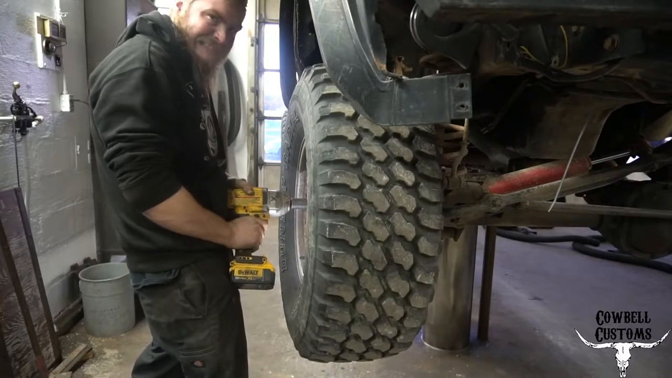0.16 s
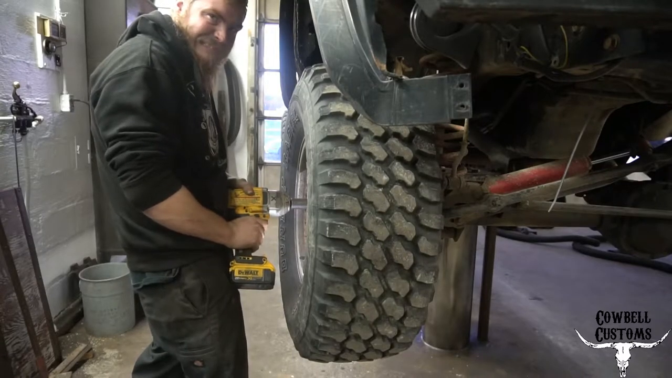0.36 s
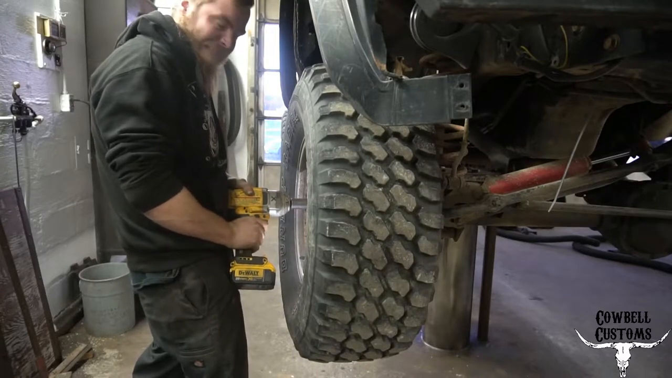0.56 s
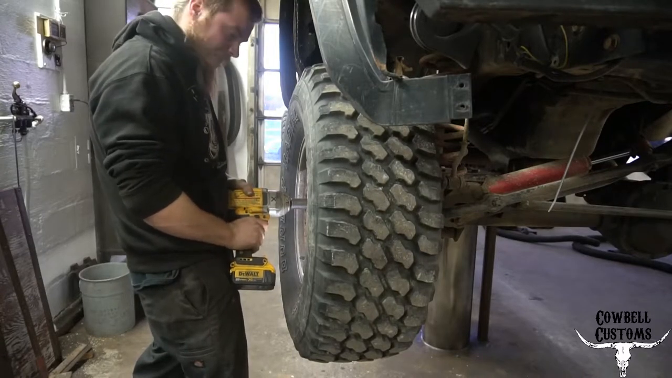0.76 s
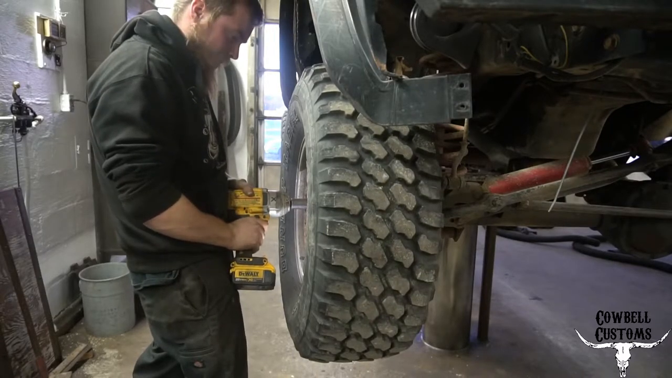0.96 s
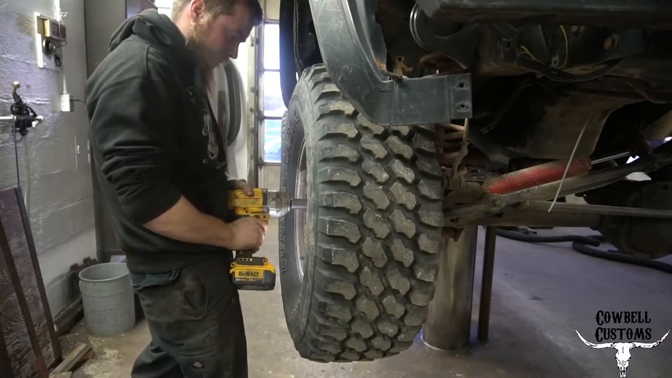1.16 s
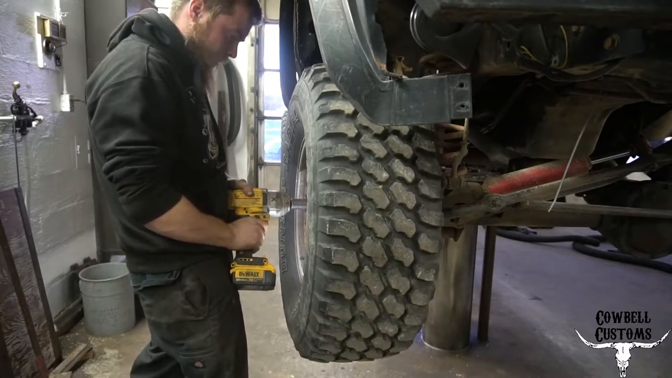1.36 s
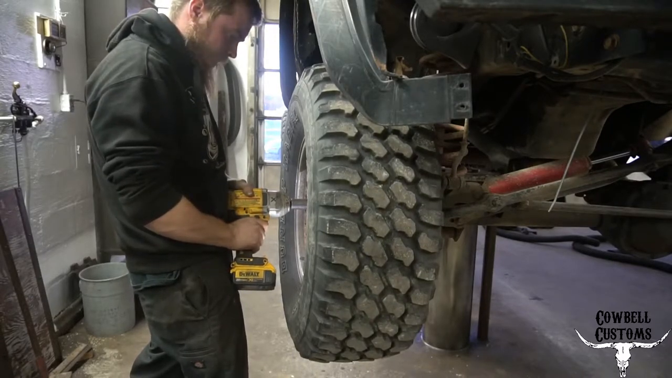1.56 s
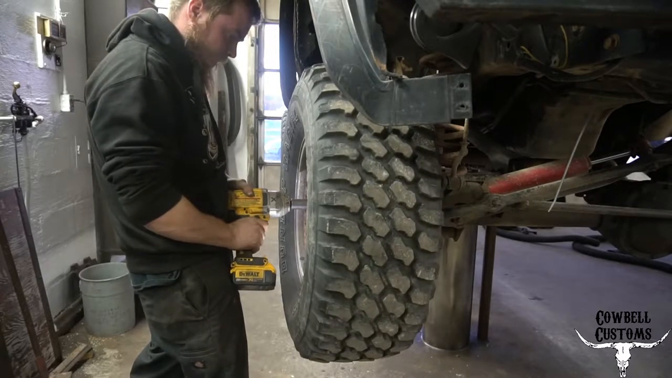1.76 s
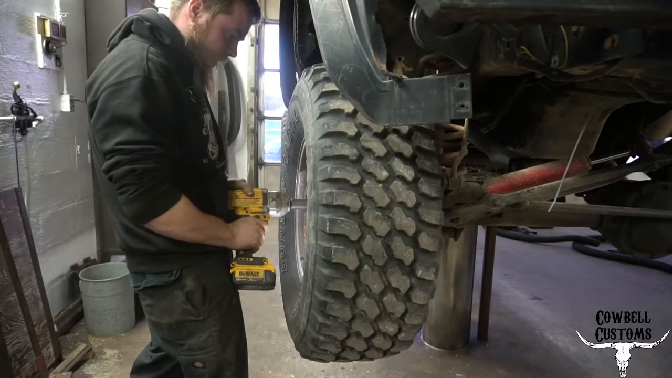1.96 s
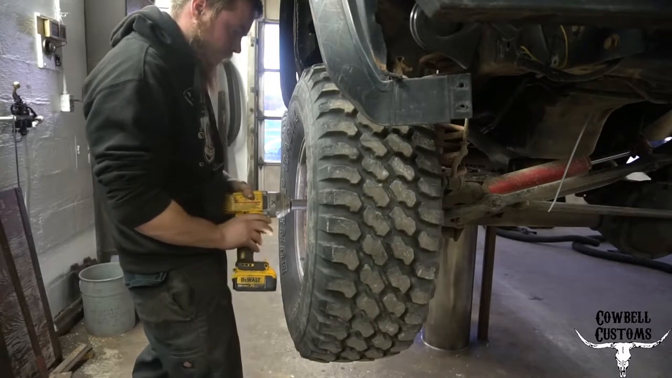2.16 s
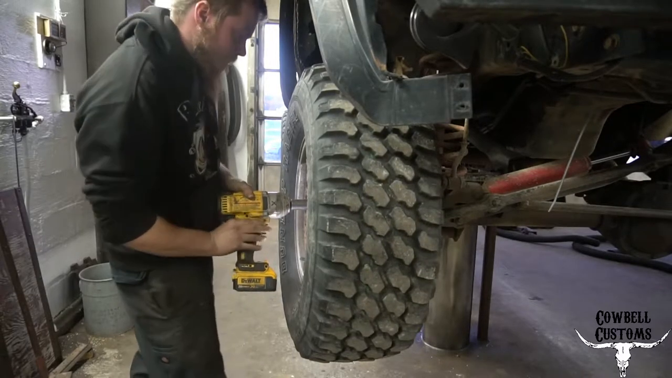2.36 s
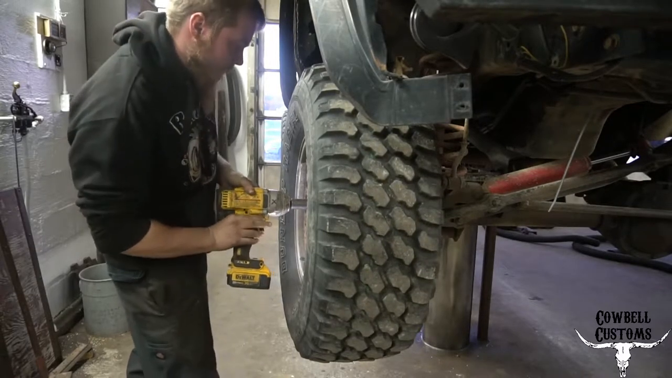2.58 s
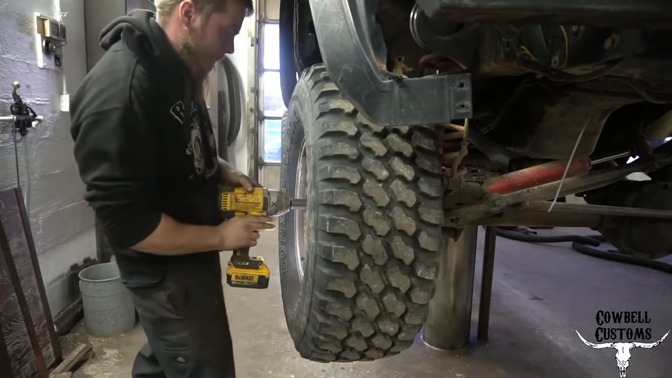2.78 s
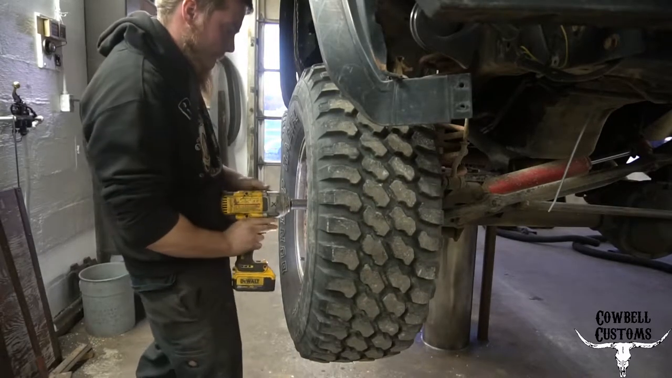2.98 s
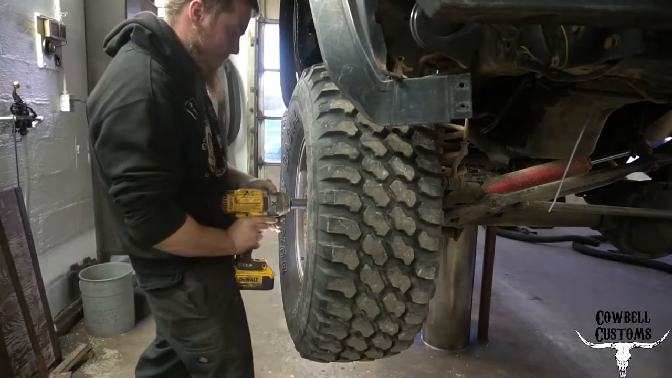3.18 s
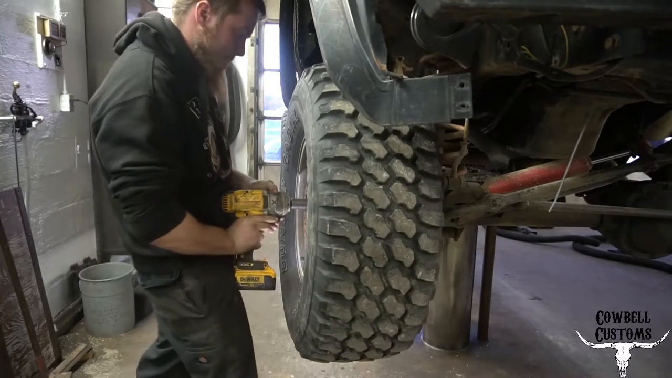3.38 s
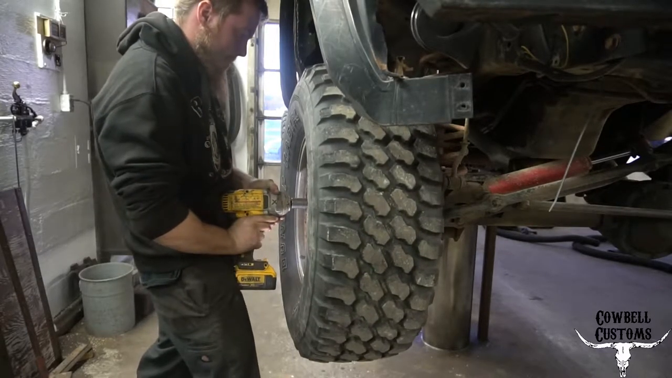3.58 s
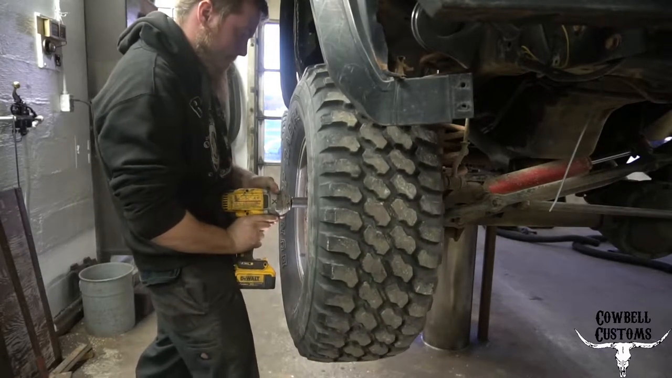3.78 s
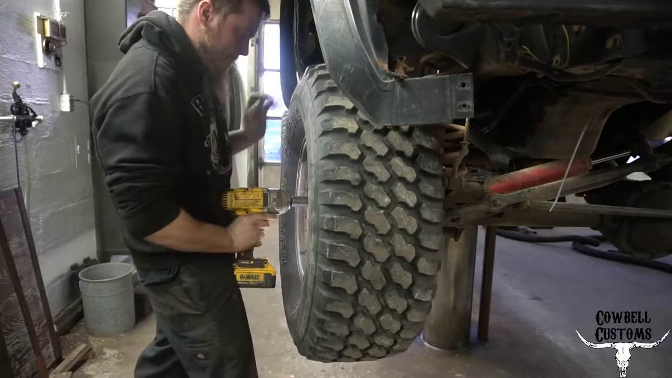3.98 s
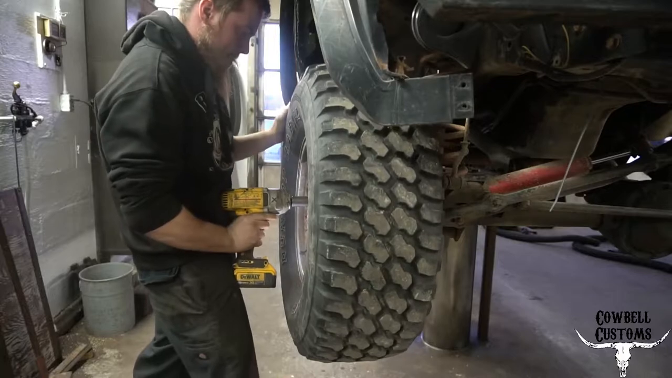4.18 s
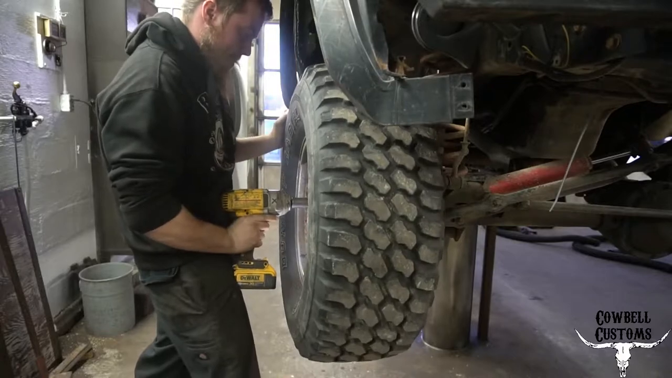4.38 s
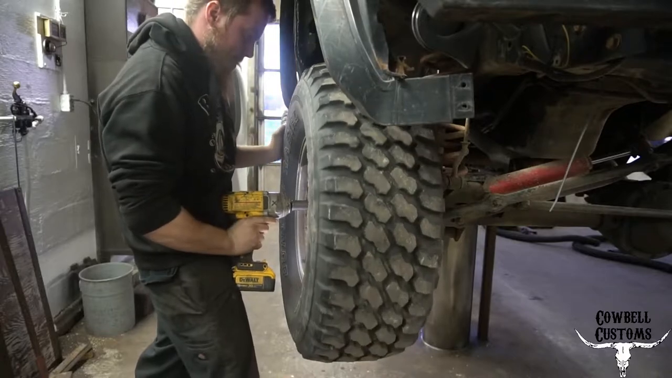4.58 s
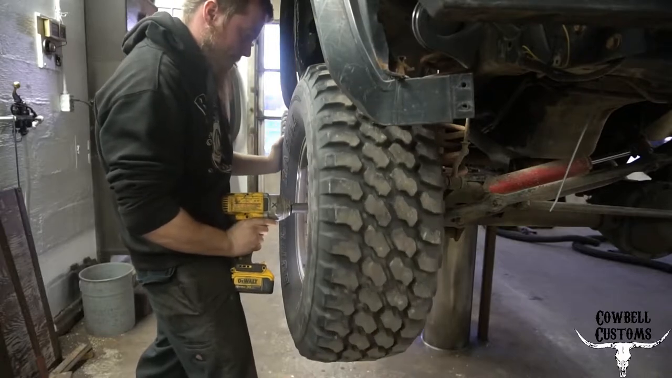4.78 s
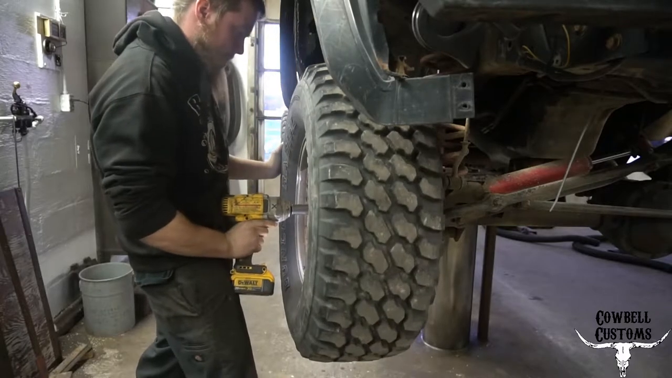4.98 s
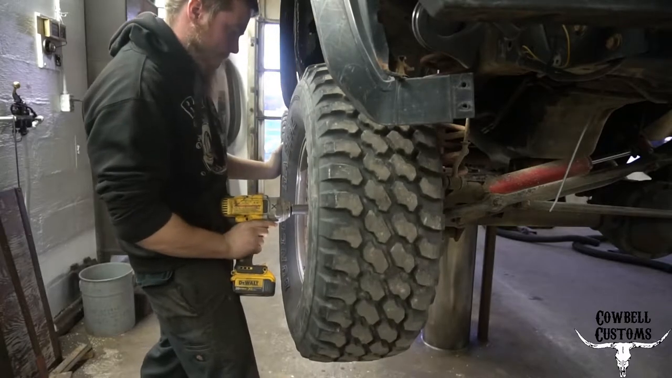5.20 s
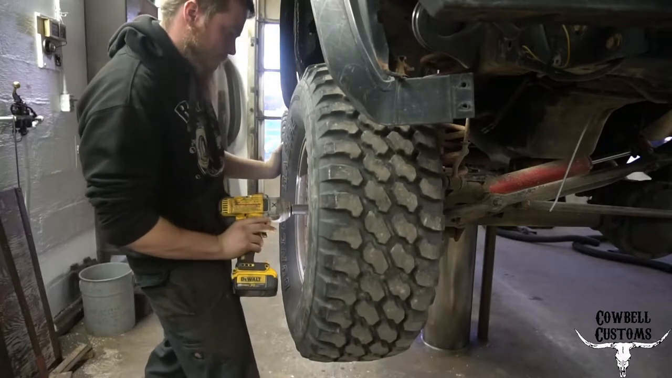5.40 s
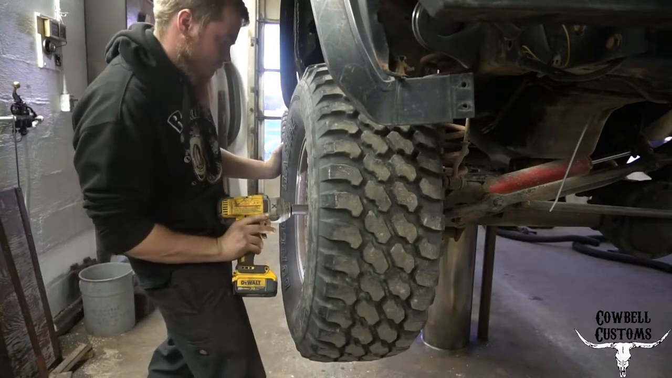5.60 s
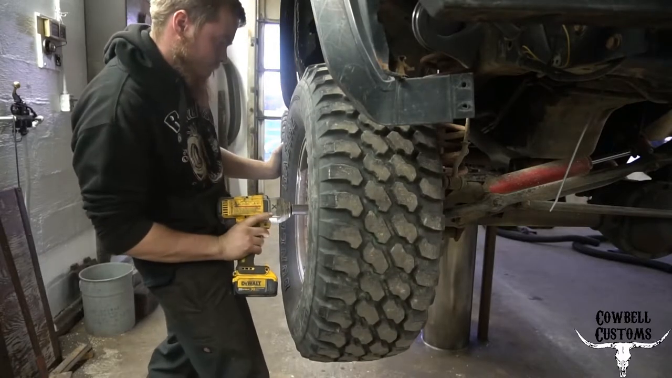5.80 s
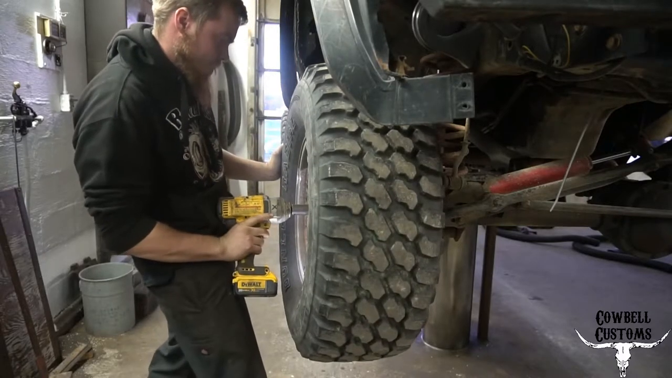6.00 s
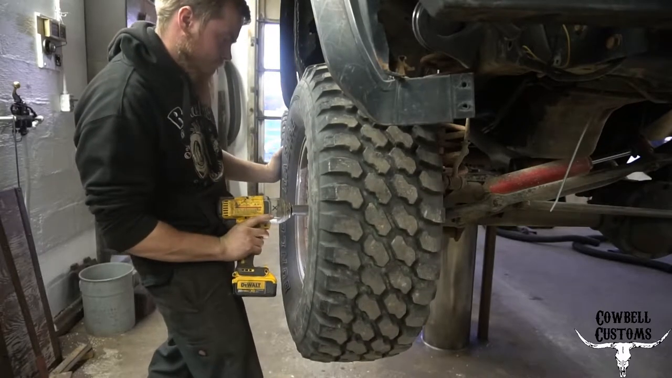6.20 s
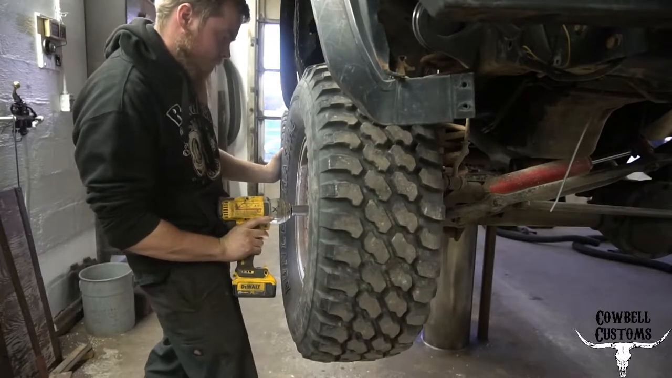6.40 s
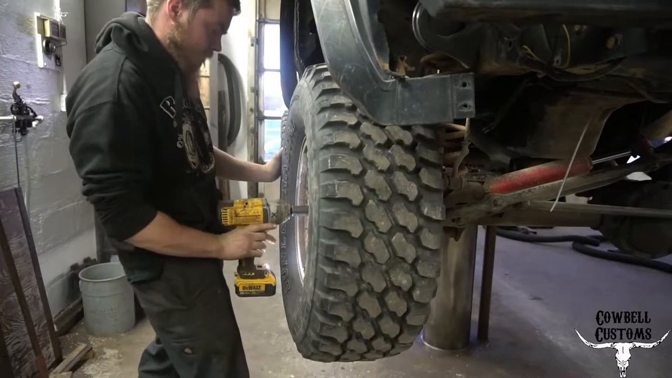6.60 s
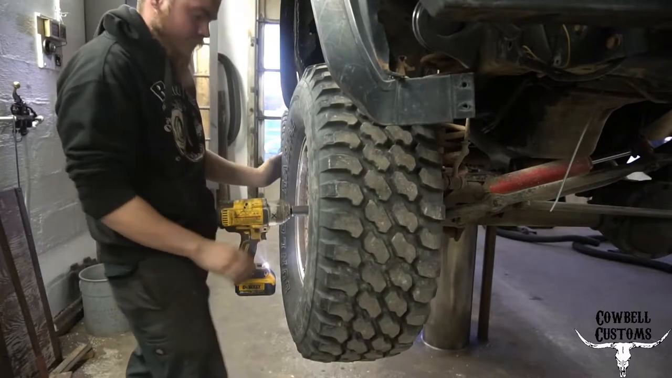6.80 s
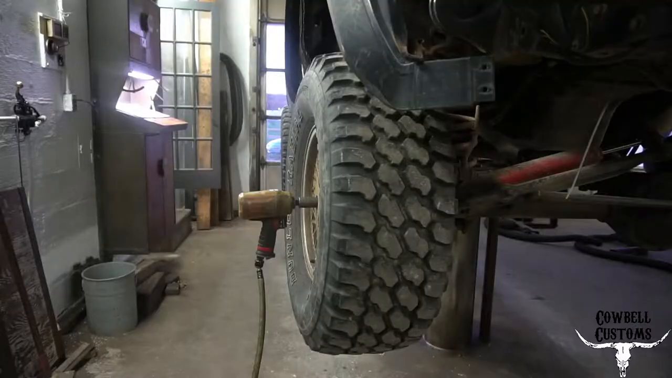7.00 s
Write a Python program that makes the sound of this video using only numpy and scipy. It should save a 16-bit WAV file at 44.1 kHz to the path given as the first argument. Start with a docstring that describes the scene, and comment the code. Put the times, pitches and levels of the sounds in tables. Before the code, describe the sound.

Hammering is already under way at 0 s: an impact wrench pounds a wheel nut at about 29 blows a second, a harsh, crackling steel rattle with bright short rings, wheel resonance and faint low tyre shaking. It stops near 2.1 s with a soft knock and a few quickening clanks; the hard-walled workshop rings out. A switch click follows at 2.4 s, with very faint ticks near 2.8 s over quiet air. At 3.2 s the trigger clicks, the motor briefly whirrs, loose clanks sound, and a second, more clattery burst runs from 3.3 to 5.3 s, its wheel ring damped after 4.7 s. It bounces to a stop, with a click at 5.5 s. Another click and spin-up at 5.8 s lead to a short burst from 5.9 to 6.5 s, ending in clanks that grow harder. At 6.8 s a compressor's low hum and throbbing airy rush cut in abruptly and continue to the end. The microphone is close and overloaded.

```python
"""An impact wrench hammers three tight lug nuts in a hard-walled workshop, close to an overloaded microphone.
Each blow is a short series of contacts: anvil modes ring, a noisy crack rides on top, wheel and room ring after.
The switch clicks, the motor spins up, the socket clanks at starts and stops; tyre and axle shake at the blow rate.
Behind it lies quiet shop air, coloured noise; at the end a compressor's tones and throbbing rush cut in."""
import sys
import numpy as np
from scipy import signal
from scipy.io import wavfile

SR = 44100
rng = np.random.default_rng(int(sys.argv[2]) if len(sys.argv) > 2 else 0)


def file_out(sig):
    """Save sig as 16-bit WAV at sys.argv[1]."""
    # one column per channel
    cols = np.atleast_2d(sig).T
    # limit, then scale
    lim = np.clip(cols, -1, 1)
    pcm = np.round(lim * 32767).astype(np.int16)
    wavfile.write(sys.argv[1], SR, pcm)


N = 310905
TIME = np.arange(N) / SR  # seconds

# Hammer bursts, one per nut. Each row: first blow in seconds, last blow in seconds, blows per second.
BURSTS = [(.0096, 2.098, 29.212), (3.3137, 5.285, 29.43), (5.9311, 6.511, 29.295)]
# Socket seating per nut. Each row: offsets of ring, crack and room in dB, anvil pitch factor, its drift per second,
# clatter of an askew socket in dB, tyre boom in dB, axle shudder in dB.
SEATS = [(6, 1.5, 1.5, 1.006, 0.0055, -2, -37.5, -52), (4.5, 2, 1, 1.06, -0.038, 4.5, -40.5, -59),
         (6.5, 1, 0.9, 0.985, -.01, -1, -42, -44)]
# Contacts in one blow, first a graze of the lugs. Each row: delay in seconds, then ring, crack and
# share sent to wheel and room, in relative dB.
BLOW_CONTACTS = [(-.0009, -13.5, -9.5, -13), (0, -0.5, -2.5, 1), (.0059, -0.5, 1, -1),
                 (.0103, -15.5, -2, -9), (.0134, -9, -2, -12.5)]
# Loose clanks of socket and hammer as the motor takes up slack. Each row: time in seconds, then ring,
# crack and room in relative dB.
SLACK_CLANKS = [(3.2506, -14, 2, 2.5), (3.2732, 1, -19, 2.5), (3.281, -15, -7, 8), (3.2929, -10, 6.5, -5.5),
                (5.867, -17, -9, -4.5), (5.893, -3, -29, -13), (5.9008, -5, -4, 2.5), (5.9114, -6, 2, 1)]
# Hammer bouncing out on release. Each row: start in seconds, first gap in seconds, number of clanks,
# ring, crack and room in relative dB, change per clank in dB.
RUN_DOWNS = [(2.1403, 0.019, 3, 1, 3, 7, -3), (5.327, 0.02, 4, 0, 4.5, 5, -3.5),
             (6.548, .014, 3, 0.5, 0.5, 1.5, 4.5)]
GAP_SHRINK, ROOM_FADE_DB = .83, 4.5  # per bounce: gap factor, extra loss to wheel and room
# Anvil and socket modes. Each row: nominal frequency in Hz, relative level in dB, t60 in seconds,
# share of the clatter dB added to the level.
ANVIL_MODES = [(1907, -14.5, 0.013, 0.7), (2160, -13, 0.0063, -0.5), (2594, -4.5, 0.0093, -0.04),
               (2860, -3.5, 0.0096, -0.55), (3500, -11, 0.01, 1), (4020, -13.5, 0.0093, 0.46)]
# Spectrum of the contact crack. Each row: frequency in Hz, relative level in dB per Hz.
CRACK_SPECTRUM = [(40, -24), (300, -12), (900, -4), (1400, -1.5), (2500, -1.5), (4000, 2.5), (6500, -1.5),
                  (8200, -6), (9800, -3), (12300, -10.5), (14000, -22.5), (16000, -34.5)]
# Spectrum of blows spread through the shop, also of gear noise. Each row: frequency in Hz, relative level in dB per Hz.
SPREAD_SPECTRUM = [(24, -52), (40, -23.5), (146, -17.5), (380, -11.5), (535, -3), (700, -8), (797, -1),
                   (1410, -10.5), (1860, -7), (2160, -8), (2990, -2), (3560, -7), (5440, -5), (8310, -14),
                   (10900, -16.5), (15500, -33)]
# Steel wheel modes. Each row: frequency in Hz, relative level in dB, t60 in seconds.
WHEEL_MODES = [(518, -11, 0.12), (804, -3, 0.36), (850, -3, 0.1), (978, 1.5, 0.076), (1181, -1, 0.085),
               (1380, 1.5, 0.1), (2940, -2, 0.054), (3450, -16, .08), (4100, 4, 0.12), (4870, -16, 0.097)]
# The wheel rings more as the nut clamps it, less once a hand rests on the tyre.
LOOSE_DB, CLAMP_S = -8, 0.45
HAND_S, HAND_SETTLE_S, HAND_DB = 4.69, 0.11, -23
# Room decay. Each row: frequency in Hz, t60 in seconds.
ROOM_DECAY = [(150, 0.83), (400, 0.7), (1040, 1.034), (2760, 0.88), (7280, 0.45), (13000, 0.36)]
# Tyre boom. Each row: multiple of the blow rate, relative level in dB, share of the swell.
TYRE_HARMONICS = [(4, -9.5, 0), (5, -10, 0), (7, -4.5, 1.11), (8, 1, 0), (10, 0, 1.34), (11, -4, 1)]
# Swells of the tyre boom. Each row: centre in seconds, half width in seconds, rise in dB.
TYRE_SWELLS = [(3.53, 0.35, 12), (4.53, 0.32, 11)]
# Trigger and switch clicks. Each row: time in seconds, relative level in dB.
CLICKS = [(2.395, -10.5), (2.819, -33), (2.885, -38), (3.1945, -18), (5.531, -16), (5.825, -18)]
# Free motor spin before the hammer engages. Each row: start and end in seconds, whine in Hz,
# direct whine in dB, direct gear noise in dB.
SPIN_UPS = [(3.19, 3.248, 3500, -59, -39), (5.837, 5.866, 1410, -31, -47)]
# Soft knocks of tool on wheel. Each row: time in seconds, level in dB, width in seconds.
THUMPS = [(2.103, -2, 0.00096), (5.081, -15, 0.0026)]
# Compressor tones. Each row: frequency in Hz, relative level in dB.
PUMP_TONES = [(140.0, -24), (209.9, -29), (279.9, -27.5), (419.9, -35), (559.9, -31), (726.7, -41),
              (775.2, -34), (974.4, -43)]
# Spectrum of the compressor's rush of air. Each row: frequency in Hz, relative level in dB per Hz.
COMPRESSOR_SPECTRUM = [(18, -48), (30, -18), (85, -18), (130, -1.5), (202, -5), (237, -10.5), (420, -9.5),
                       (492, -11.5), (747, -11), (921, -14), (1470, -16.5), (2910, -27.5), (5740, -30),
                       (15500, -63)]
# Spectrum of the quiet shop air. Each row: frequency in Hz, relative level in dB per Hz.
SHOP_SPECTRUM = [(15, -35), (25, -26), (64, -33.5), (139, -9), (219, -21), (286, -11.5), (318, -16.5),
                 (475, -17.5), (558, -13.5), (621, -20), (952, -21), (5280, -37), (7500, -50), (15000, -67)]
SHOP_DB, COMPRESSOR_DB, PUMP_START_S = -43.5, -19.5, 6.822
BAND_EDGE_HZ = 15800


def hammering(burst, seat, jitter_s=.0001, uneven_db=1.0, sway_s=.0002):
    """Near-evenly spaced blows, each a series of contacts: rows (s, ring dB, crack dB, room dB)."""
    first_s, last_s, rate_hz = burst
    blows_s = first_s + np.arange(round((last_s - first_s) * rate_hz) + 1) / rate_hz
    blows_s = blows_s + sway_s * rng.standard_normal(len(blows_s))
    delay_s, ring_db, crack_db, room_db = np.tile(BLOW_CONTACTS, (len(blows_s), 1)).T
    late, hard, tight = rng.standard_normal((len(delay_s), 3)).T
    looseness = 1 + delay_s / .012  # later rebounds are less regular
    times_s = np.repeat(blows_s, len(BLOW_CONTACTS)) + delay_s + jitter_s * late * looseness
    seat_ring_db, seat_crack_db, seat_room_db = seat[:3]
    ring_db = ring_db + seat_ring_db + uneven_db * tight * looseness
    crack_db = crack_db + seat_crack_db + uneven_db * hard * looseness
    return np.column_stack([times_s, ring_db, crack_db, room_db + seat_room_db])


def run_down(start_s, first_gap_s, clanks, ring_db, crack_db, room_db, change_db):
    """The released hammer bounces at ever shorter gaps: rows (s, ring dB, crack dB, room dB)."""
    k = np.arange(round(clanks))
    gaps_s = first_gap_s * GAP_SHRINK ** k
    times_s = start_s + np.cumsum(gaps_s) - gaps_s
    step_db = change_db * k
    faded_room_db = room_db + step_db - ROOM_FADE_DB * k
    return np.column_stack([times_s, ring_db + step_db, crack_db + step_db, faded_room_db])


def strikes(contacts, anvil_db=3.0, near_db=11, far_db=12.5, wheel_db=0.0, ring_wet_db=-19, echo_s=0.025, echo_db=-21):
    """Ring and crack arrive directly and once off a wall; the wheel spreads each contact through the shop."""
    times_s, ring_db, crack_db, room_db = np.transpose(contacts)
    ring = amp(anvil_db) * anvil(times_s, ring_db)
    crack_force = pushes(times_s, crack_db, scrape=2.86, t60_s=0.0065, rise_s=0.00025)
    crack = amp(near_db) * colour(crack_force, CRACK_SPECTRUM)
    force = pushes(times_s, room_db, scrape=2.94, t60_s=0.016)
    wheel_ring = wheel(force * amp(wheel_db + coupling_db()))
    spread = amp(far_db) * colour(force, SPREAD_SPECTRUM) + wheel_ring
    direct = ring + crack
    add(direct, echo_s, amp(echo_db) * direct)
    return direct + room(spread + amp(ring_wet_db) * ring)


def anvil(times_s, db, rise_s=0.000803, scatter=0.033, uneven_db=2.0, stagger_cycles=0.096, wander=.024):
    """Anvil modes ring for a few cycles; each contact excites them a little differently."""
    t, out = np.arange(768) / SR, np.zeros(N)
    hz, mode_db, t60_s, lift = np.transpose(ANVIL_MODES)[:, :, None]
    shape = (1 - np.exp(-t / rise_s)) * amp(mode_db - 60 * t / t60_s)
    which, worked_s = nut_at(times_s)
    seat_pitch, drift, clatter = np.array(SEATS)[which, 3:6].T
    pitches = seat_pitch + drift * worked_s + wander * rng.standard_normal(len(times_s))
    for s, level_db, pitch, clatter_db in zip(times_s, db, pitches, clatter):
        detune, weight, lag = rng.standard_normal((3, len(ANVIL_MODES), 1))
        mode_hz = hz * pitch * (1 + scatter * detune)
        swing = np.sin(2 * np.pi * (mode_hz * (t - rise_s) + stagger_cycles * lag))
        gain = amp(level_db + lift * clatter_db + uneven_db * weight)
        add(out, s, (gain * shape * swing).sum(0))
    return out


def pushes(times_s, db, scrape, t60_s, rise_s=0.00032, steady_hz=320):
    """Force of steel contacts: a push alike each time in the bass, a brief random scrape above it."""
    t, (push, rough) = np.arange(1024) / SR, np.zeros((2, N))
    shape = (1 - np.exp(-t / rise_s)) * amp(-60 * t / t60_s)
    for s, level_db in zip(times_s, db):
        grit = rng.standard_normal(len(t)) * shape
        add(push, s, amp(level_db) * (t == 0))
        add(rough, s, amp(level_db) * grit / np.linalg.norm(grit))
    force = (push + scrape * rough) / np.hypot(1, scrape)
    # below steady_hz the bare push replaces the mixture
    return force + signal.lfilter(*signal.butter(1, steady_hz, fs=SR), push - force)


def nut_at(times_s):
    """Index of the nut being worked at these times, and seconds worked so far."""
    first_s, last_s, _ = np.transpose(BURSTS)
    which = np.searchsorted((last_s[:-1] + first_s[1:]) / 2, times_s)
    return which, np.maximum(times_s - first_s[which], 0)


def wheel(force):
    """Contact force excites decaying modes of the steel wheel."""
    t = np.arange(SR // 3) / SR
    ring = sum(amp(db - 60 * t / t60_s) * np.sin(2 * np.pi * hz * t) for hz, db, t60_s in WHEEL_MODES)
    return signal.oaconvolve(force, ring / np.linalg.norm(ring))[:N]


def coupling_db():
    """The wheel's answer grows as each nut clamps and drops under the hand."""
    _, worked_s = nut_at(TIME)
    clamp_db = LOOSE_DB * np.exp(-worked_s / CLAMP_S)
    return clamp_db + HAND_DB * np.clip((TIME - HAND_S) / HAND_SETTLE_S, 0, 1)


def shaking(burst, seat):
    """Tyre and axle shake on multiples of the blow rate, with low noise in the shudder."""
    first_s, last_s, rate_hz = burst
    boom_db, shudder_db = seat[-2:]
    turns = rate_hz * (TIME - first_s)
    swell_db = sum(db * np.exp(-((TIME - s) / width_s) ** 2) for s, width_s, db in TYRE_SWELLS)
    boom = sum(amp(db + share * swell_db) * np.sin(2 * np.pi * (round(k) * turns + rng.random()))
               for k, db, share in TYRE_HARMONICS)
    shudder = np.sin(2 * np.pi * 2 * turns) + 0.92 * noise([(20, -1), (70, -6), (300, -35), (2000, -84)])
    return (amp(boom_db) * boom + amp(shudder_db) * shudder) * gate(first_s, last_s, 0.024)


def trigger(snap_db=6, rattle_db=4, wet_db=-14):
    """The switch snaps and rattles; before the hammer engages the motor whines and its gears rush."""
    s, db = np.transpose(CLICKS)
    snap = pushes(s, db + snap_db, scrape=1.5, t60_s=0.0068)
    rattle = pushes(s, db + rattle_db, scrape=4.5, t60_s=0.089)
    out = colour(snap + rattle, [(200, -8), (1500, 5), (3500, 3.0), (10500, -6.5), (15000, -27)])
    gears = noise(SPREAD_SPECTRUM)
    for start_s, end_s, hz, whine_db, gear_db in SPIN_UPS:
        whine = amp(whine_db) * np.sin(2 * np.pi * hz * TIME)
        out += gate(start_s, end_s, .002) * (whine + amp(gear_db) * gears)
    return out + amp(wet_db) * room(out)


def thumps():
    """Low pushes of tool on wheel, with no ring."""
    out = np.zeros(N)
    for s, db, width_s in THUMPS:
        u = np.arange(SR // 10) / SR / width_s
        add(out, s, amp(db) * u * (2 - u) * np.exp(-u))
    return out


def room(x, early_db=4, early_s=0.064, gap_s=0.00068, count=3):
    """Dense reflections with a decay per band; random tails cross-fade, so the reverberation keeps changing slightly."""
    out = np.zeros(N)
    for k in range(count):
        hz, t, z = signal.stft(rng.standard_normal(SR), SR, nperseg=256)
        tail = signal.istft(z * amp(-60 * t / read(ROOM_DECAY, hz)[:, None]), SR, nperseg=256)[1]
        t = np.arange(len(tail)) / SR
        early = amp(early_db * np.exp(-t / early_s))  # near wall and chassis answer first
        tail = tail * early * (1 - np.exp(-t / gap_s))
        share = np.sqrt(2 / count) * abs(np.cos(np.pi * (8 * TIME + k / count)))  # 8 cross-fades a second
        out += signal.oaconvolve(x * share, tail / np.linalg.norm(tail))[:N]
    return out


def compressor(tones_db=-1, throb=0.083, stroke_hz=70):
    """Pump tones over a rush of air that throbs with the piston."""
    tones = sum(amp(db) * np.sin(2 * np.pi * (hz * TIME + rng.random())) for hz, db in PUMP_TONES)
    rush = noise(COMPRESSOR_SPECTRUM) * (1 + throb * np.sin(2 * np.pi * stroke_hz * TIME))
    onset = np.clip((TIME - PUMP_START_S) / 0.0018, 0, 1)
    return (amp(tones_db) * tones + amp(COMPRESSOR_DB) * rush) * onset


def shop_air():
    """Quiet steady air of the shop: coloured noise."""
    return amp(SHOP_DB) * noise(SHOP_SPECTRUM)


def noise(spectrum):
    """Steady coloured noise of rms 1."""
    return unit(colour(rng.standard_normal(N), spectrum))


def colour(x, spectrum, size=4096):
    """Causal minimum-phase filter of unit energy with the given spectrum."""
    log_gain = np.log(amp(read(spectrum, abs(np.fft.fftfreq(size, 1 / SR)))))
    response = np.exp(np.conj(signal.hilbert(log_gain)))
    taps = np.fft.ifft(response).real[:size // 2]
    return signal.oaconvolve(x, taps / np.linalg.norm(taps))[:N]


def read(points, hz):
    """Interpolates a table on a log-frequency axis."""
    f, value = np.transpose(points)
    return np.interp(np.log(hz + 1), np.log(f + 1), value)


def gate(start_s, end_s, edge_s):
    """1 between start and end, with linear ramps inside."""
    return np.clip((TIME - start_s) / edge_s, 0, 1) * np.clip((end_s - TIME) / edge_s, 0, 1)


def add(mix, s, sound):
    """Mixes a sound in, in place, at time s."""
    part = mix[max(round(s * SR), 0):][:len(sound)]
    part += sound[:len(part)]


def amp(db):
    """Decibels to gain."""
    return 10 ** (np.asarray(db) / 20)


def unit(x):
    """Scales to rms 1."""
    return x / np.sqrt(np.mean(x ** 2) + 1e-20)


def scene():
    """The wrench over shop air, then the compressor."""
    nuts = list(zip(BURSTS, SEATS))
    contacts = [hammering(*nut) for nut in nuts] + [SLACK_CLANKS] + [run_down(*row) for row in RUN_DOWNS]
    wrench = strikes(np.vstack(contacts)) + sum(shaking(*nut) for nut in nuts) + trigger() + thumps()
    return (wrench + shop_air() + compressor())[None]


def record(dry, threshold_db=-1, recovery_db_per_s=70, share=0.54, knee=8):
    """A limiter ducks on loud peaks and recovers; remaining peaks saturate; a low-pass limits the band."""
    peak_db = 20 * np.log10(abs(dry[0]) + 1e-9)
    fall_db = TIME * recovery_db_per_s
    held_db = np.maximum.accumulate(peak_db + fall_db) - fall_db
    over_db = np.maximum(held_db - threshold_db, 0)
    smooth_db = signal.lfilter([1 / 20], [1, 1 / 20 - 1], over_db)  # 20-sample attack
    ducked = dry / amp(share * smooth_db)
    clipped = ducked / (1 + abs(ducked) ** knee) ** (1 / knee)
    low_pass = signal.firwin(511, BAND_EDGE_HZ, window=("kaiser", 9), fs=SR)
    return signal.oaconvolve(clipped, low_pass[None], "same")


dry = scene()
out = record(dry)
file_out(out)
```